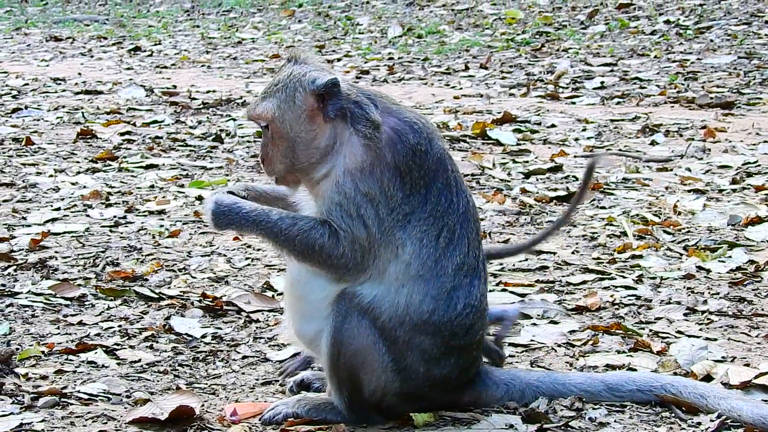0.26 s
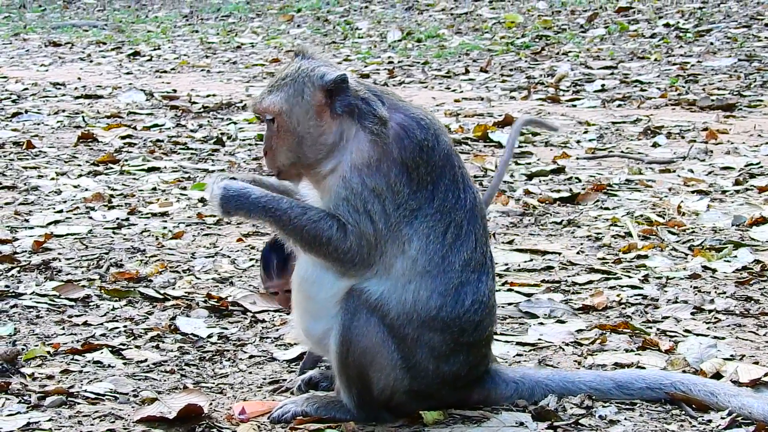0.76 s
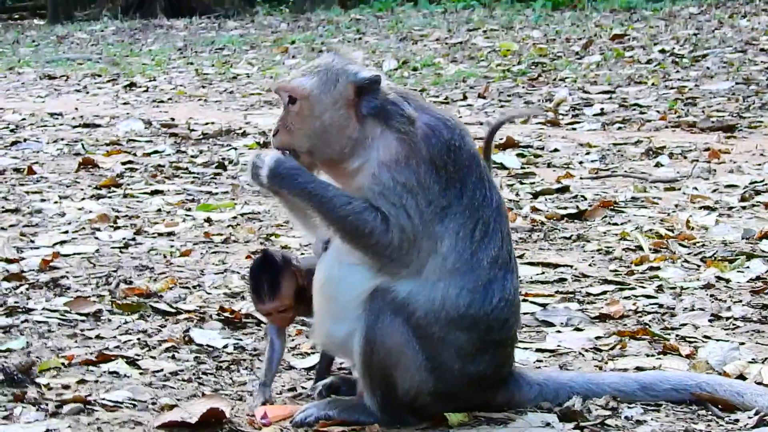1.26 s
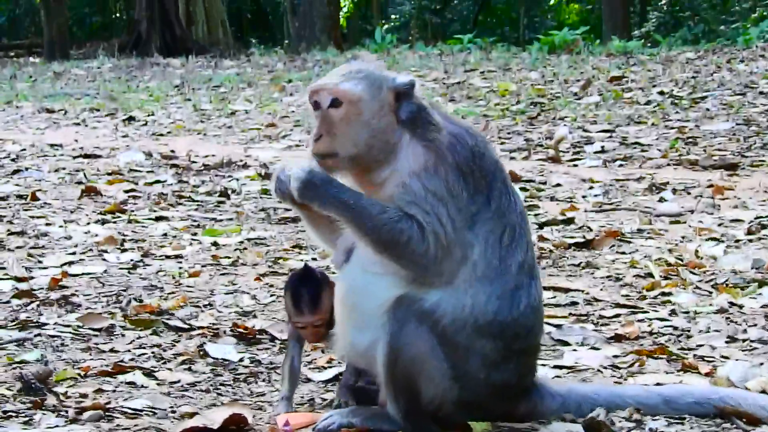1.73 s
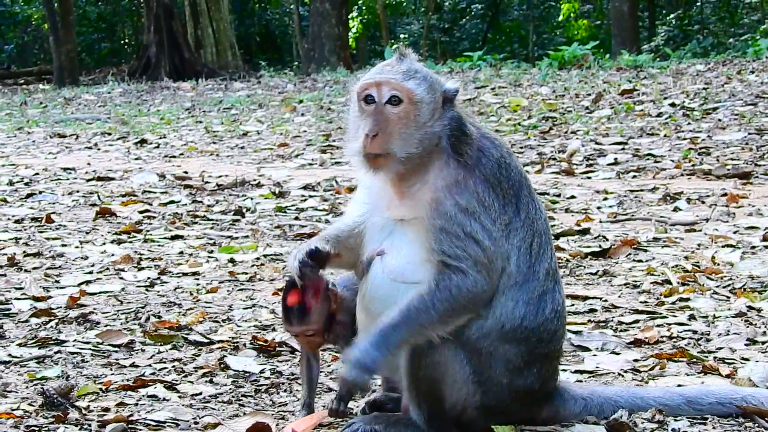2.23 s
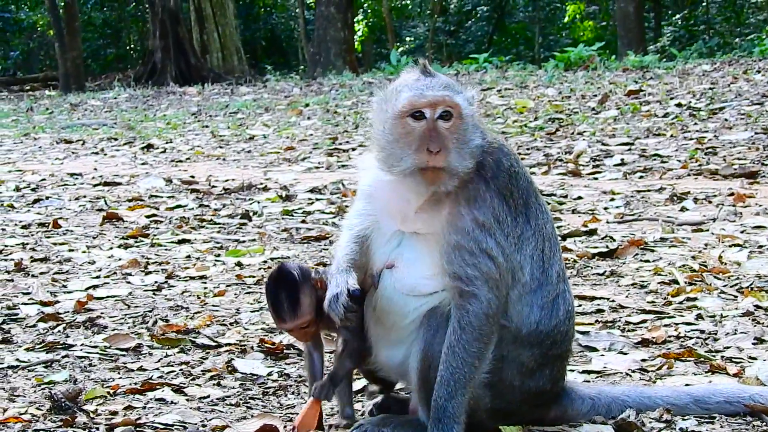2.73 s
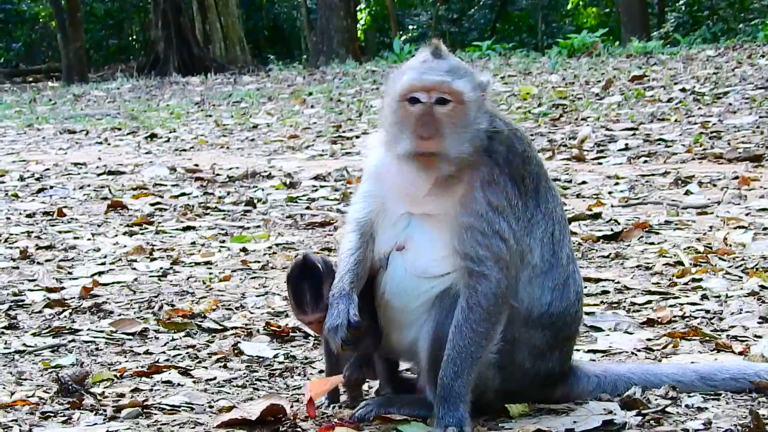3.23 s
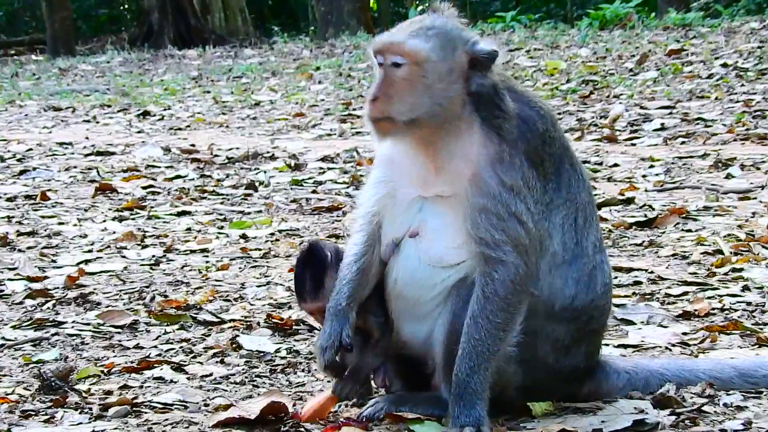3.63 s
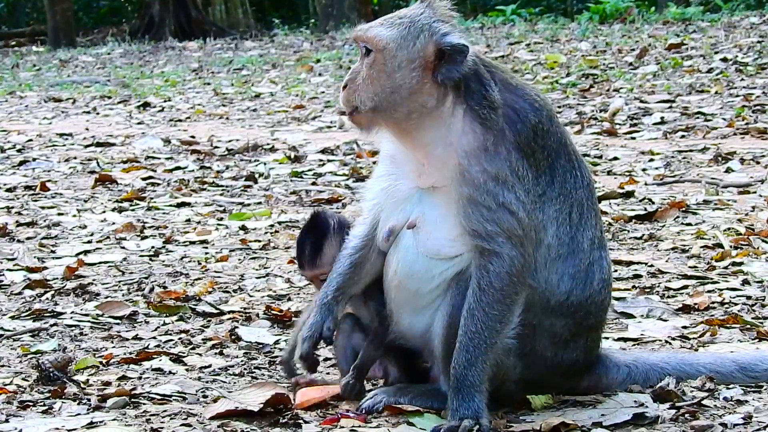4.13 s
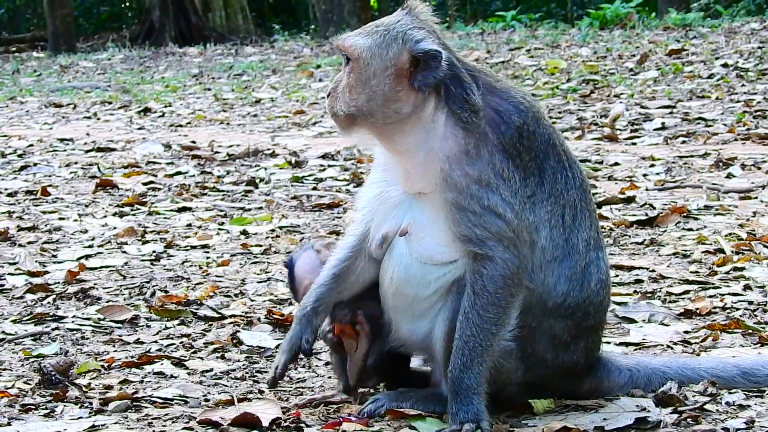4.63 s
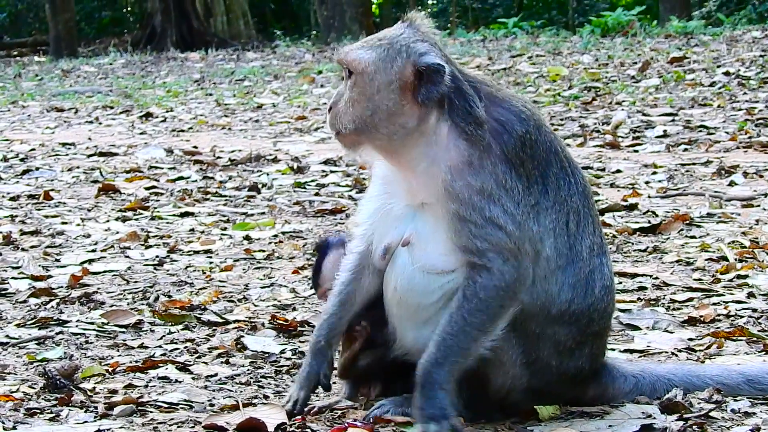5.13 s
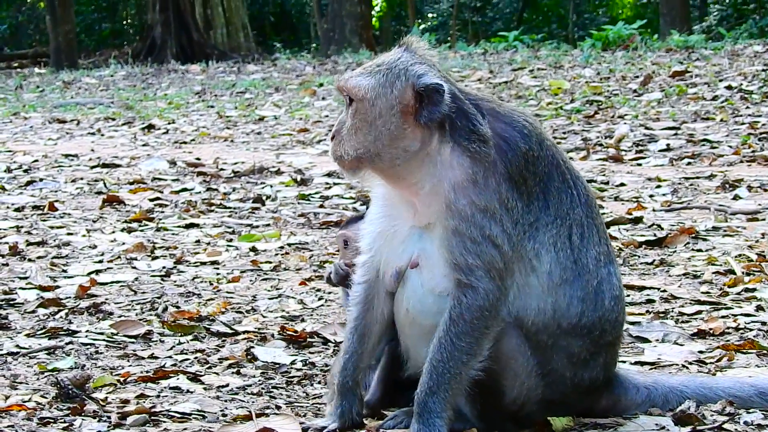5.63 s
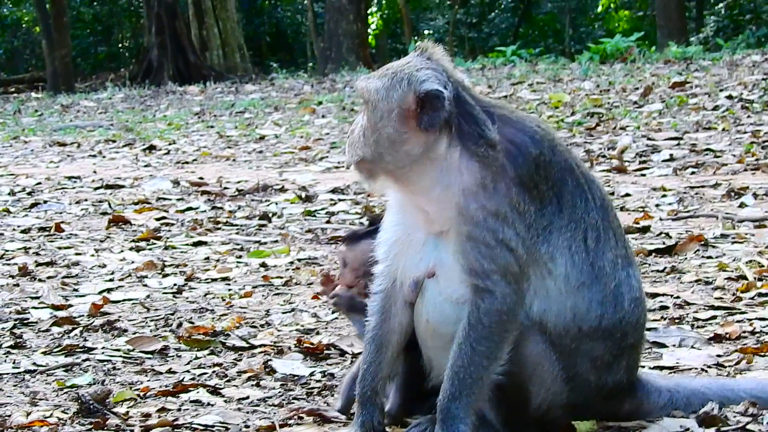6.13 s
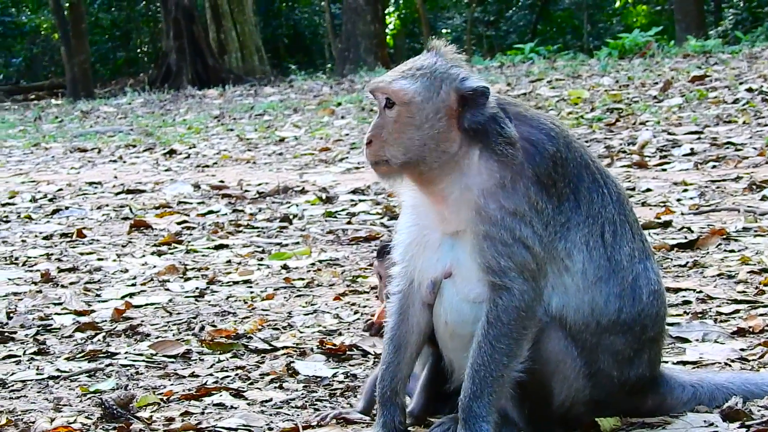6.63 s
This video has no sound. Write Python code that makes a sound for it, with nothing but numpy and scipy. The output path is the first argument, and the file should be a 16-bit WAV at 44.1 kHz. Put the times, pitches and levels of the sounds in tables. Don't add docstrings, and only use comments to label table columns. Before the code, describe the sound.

A steady metallic insect whine fills a forest clearing, with a nearer cicada pulsing about two phrases a second, clear at first and buzzy later. Low engine hum and distant traffic sit underneath, coming closer toward the end. Faint leaf scuffs and soft clicks appear early; a sharp lip pop and stronger smacks follow in the middle, then two more smacks and small bird calls. Open stereo pickup.

```python
import sys
import numpy as np
from scipy import signal
from scipy.fft import irfft, next_fast_len
from scipy.io import wavfile
from scipy.ndimage import uniform_filter1d

SR = 44100
rng = np.random.default_rng(int(sys.argv[2]) if len(sys.argv) > 2 else 0)


def invert_db(x):
    u = np.asarray(x, float) / 20
    return 10 ** u


def generate_wav(sig):
    pcm = np.round(np.clip(np.atleast_2d(sig).T, -1, 1) * 32767).astype(np.int16)
    wavfile.write(sys.argv[1], SR, pcm)


N = 303408
T = np.arange(N) / SR


def evened(x):
    return x / np.sqrt(np.mean(x ** 2) + 1e-20)


def curve(points):
    return np.interp(T, *np.transpose(points))


def read(points, hz):
    f, value = np.transpose(points)
    return np.interp(np.log(hz + 1), np.log(f + 1), value)


def sides(x, pan_db):
    return np.array([x * invert_db(pan_db / 2), x * invert_db(-pan_db / 2)])


def add(mix, s, sound):
    part = mix[:, round(s * SR):][:, :sound.shape[1]]
    part += sound[:, :part.shape[1]]


def drift(hz):
    f = np.fft.rfftfreq(next_fast_len(N), 1 / SR)
    z = rng.standard_normal((len(f), 2)) @ [1, 1j]
    return evened(irfft(z * np.exp(-(f / hz) ** 2))[:N])


def ring(x, hz, width):
    return signal.lfilter(*signal.iirpeak(hz, hz / width, SR), x)


def ring_twice(x, hz, width, second_width):
    return ring(ring(x, hz, width), hz, second_width)


def forest(x, t60=0.8, shared=0.57):
    t = np.arange(SR) / SR
    signs = rng.choice([-1., 1.], (3, SR))
    taps = signs * (rng.random((3, SR)) < .05) * invert_db(-60 * t / t60)
    taps = shared * taps[2] + np.sqrt(1 - np.clip(shared, 0, 1) ** 2) * taps[:2]
    return signal.fftconvolve(x[None], taps / np.linalg.norm(taps[0]), axes=1)[:, :N]


# f/Hz, level/dB per Hz
AIR_SPECTRUM = [(40, -23.5), (74, -1), (100, -5.5), (150, -4.5), (260, -15), (600, -22), (1200, -31),
                (2000, -33), (3000, -28), (4000, -35.5), (5400, -28), (7800, -23), (9000, -42),
                (11500, -56), (14000, -85)]
# f/Hz, left-right likeness [0-1]
COHERENCE = [(60, .996), (200, .992), (500, .97), (1500, .85), (4500, .9), (13000, .2)]
# t/s, level/dB
TRAFFIC_APPROACH = [
    (0, -2),
    (1.6, -2),
    (2.9, -2.5),
    (3.6, -2),
    (4.4, 0),
    (5.4, 1),
    (6.2, 3),
    (6.88, 5.5),
]


def air():
    hop = 512
    frames, hz = N // hop + 5, np.fft.rfftfreq(2048, 1 / SR)
    a, b, c, d, patches = rng.standard_normal((frames, 1025, 5)).T
    patches = evened(uniform_filter1d(uniform_filter1d(patches, 20, 0), 6, 1))

    near_db = np.interp(np.arange(frames) * hop / SR, *np.transpose(TRAFFIC_APPROACH))
    gust_db = 0.5
    swells = []
    for share in (0.27, 0.35, 1.14):
        swells.append(share * near_db + gust_db * np.resize(drift(2.5)[::hop], frames))
    reach = [np.interp(hz, [90, 190, 650, 1600], row) for row in np.eye(4)[:3]]

    same = np.clip(read(COHERENCE, hz), -1, 1)[:, None]
    left = a + 1j * b
    right = same * left + np.sqrt(1 - same ** 2) * (c + 1j * d)
    level_db = read(AIR_SPECTRUM, hz)[:, None] + np.transpose(reach) @ swells
    level_db = level_db + 1.75 * patches * (hz[:, None] > 300)
    z = np.array([left, right]) * invert_db(level_db)
    return invert_db(-30.0) * evened(signal.istft(z, nperseg=2048, noverlap=1536)[1][:, :N])


# t/s, level/dB
IDLE_LOAD = [
    (0.0, -33),
    (0.04, -37),
    (0.61, -36),
    (3.79, -39),
    (3.87, -56),
    (3.98, -31),
    (4.83, -38.5),
    (6.86, -30),
    (6.88, -40),
]


def hum():
    line = ring(ring(rng.standard_normal(N), 77.8, 18.45), 76, 10.3)
    return evened(line) * invert_db(curve(IDLE_LOAD) - 1.5)


# t/s, firing rate/Hz, level/dB
PUTTERING = [
    (0, 18.6, -39),
    (1.002, 16.8, -37),
    (1.601, 14.1, -37.5),
    (2.399, 16.3, -41),
    (3.198, 16.2, -45),
    (4.2, 13.3, -44.5),
    (6.88, 12.9, -41.5),
]


def engine():
    s, rate, db = np.transpose(PUTTERING)
    firings = np.floor(np.cumsum(np.interp(T, s, rate)) / SR + .3)
    puffs = np.diff(firings, prepend=0) * invert_db(1.75 * drift(7.2))
    return evened(ring(ring(puffs, 314.0, 19.7), 331.6, 79)) * invert_db(np.interp(T, s, db))


# start t/s, length t/s, from f/Hz, to f/Hz, level/dB
BIRD_GLIDES = [
    (5.85, .135, 2450, 2150, -43),
    (5.9, .04, 2600, 2430, -44),
    (6.14, .09, 2250, 1780, -44),
    (6.235, .06, 1950, 1830, -40),
    (.705, .06, 2900, 3500, -43),
    (6.838, .045, 2400, 2150, -31),
    (1.33, .25, 500, 480, -40),
    (1.48, .12, 648, 647, -43),
    (5.56, .22, 3400, 3110, -43),
]


def birds():
    out = np.zeros((2, N))
    for s, length, from_hz, to_hz, db in BIRD_GLIDES:
        u = np.linspace(0, 1, round(length * SR))
        glide = from_hz + (to_hz - from_hz) * u ** .55
        glide = glide * (1 + 0.0144 * drift(83)[:len(u)])
        tone = np.sin(2 * np.pi * np.cumsum(glide) / SR)
        add(out, s, sides(invert_db(db) * tone * signal.windows.tukey(len(u), .45), 0))
    return out


# t/s, length t/s, level/dB, centre f/Hz
LEAF_RUSTLES = [
    (0.715, .25, -41, 3400),
    (0.84, 0.1, -44, 1700),
    (1.996, 0.064, -43, 1500),
    (3.737, 0.077, -40, 1000),
    (5.6, .2, -50, 3150),
    (5.899, 1, -46, 1504),
]


def rustles():
    out = np.zeros((2, N))
    for s, length, db, hz in LEAF_RUSTLES:
        size = round(length * SR)
        grains = rng.standard_normal(size) * invert_db(3 * rng.exponential(1, size).clip(0, 4))
        crackle = evened(ring_twice(grains, hz, hz, hz)) * signal.windows.tukey(size, .6)
        add(out, s, sides(invert_db(db) * crackle, -0.73))
    return out


# t/s, peak level/dB, centre f/Hz, width f/Hz, left-right level/dB
SMACKS = [(.812, -30, 1400, 714, 4), (1.692, -28, 1690, 900, -3), (3.758, -43, 892.4, 903, -29),
          (3.782, -26, 1100, 1210, -9), (4.2282, -15, 1300, 1497, -5), (4.308, -13.5, 1299, 1514, -7),
          (4.347, -39, 1410, 1200, -20), (4.359, -15.5, 730, 903, -4), (4.384, -48, 843, 613, -1),
          (6.22, -19.5, 926, 471.7, -5), (6.252, -19, 640, 297, -1)]


def smacks():
    out, click = np.zeros((2, N)), signal.unit_impulse(2000)
    for s, db, hz, width, pan_db in SMACKS:
        snap = ring_twice(click, hz, width, 0.88 * width)
        snap += .3 * np.roll(snap, round(.007 * SR))
        add(out, s, sides(invert_db(db) * snap / abs(snap).max(), pan_db))
    return out


# t/s, level/dB
LIP_SLIPS = [
    (3.4522, -10.5),
    (3.4536, -2.5),
    (3.4548, -16),
    (3.457, -7.5),
]
# f/Hz, width f/Hz, level/dB
MOUTH = [(229.6, 39, 3.5), (550, 30, 0.5), (715, 230, 13.5), (882, 104, 10.5), (1156, 200, -39),
         (1650, 350, 10), (1910, 360, 10.5), (3240, 750, -25), (6000, 3000, -24)]


def lip_pop():
    out, click = np.zeros((2, N)), signal.unit_impulse(2000)
    pop = -sum(invert_db(db) * ring_twice(click, hz, width, 2 * hz) / width for hz, width, db in MOUTH)
    for s, db in LIP_SLIPS:
        add(out, s, sides(invert_db(db) * pop / abs(pop).max(), -1.2))
    noise = rng.standard_normal((3, round(.0055 * SR)))
    crack = (noise[2] + .6 * noise[:2]) * np.hanning(noise.shape[1])
    add(out, 3.451, invert_db(-20.5) * ring(crack, 6500, 7000))
    return out


def small_sounds():
    out = birds() + rustles() + smacks() + lip_pop()
    return out + invert_db(-12.5) * forest(out.mean(0), t60=0.13, shared=0.25)


def tymbals(rate_hz, levels_db, uneven=0.046):
    k = np.arange(10, 51)
    lines = np.zeros((2, 2049), complex)
    lines[k % 2, k] = invert_db(np.interp(k / 2, np.arange(5, 26), levels_db))
    phases = np.exp(2j * np.pi * rng.random(lines.shape))
    cycles = irfft(lines * phases) * lines.shape[1] * np.sqrt(2)
    place = np.cumsum(rate_hz) / SR / 2 % 1 * cycles.shape[1]
    both, difference = (np.interp(place, np.arange(len(c)), c, period=len(c)) for c in cycles)
    return both + uneven * difference


# click rate f/Hz, level/dB, left-right level/dB
FAR_SINGERS = [
    (538.2, -3, 2),
    (539.6, 0, -3),
    (540.6, 0, 0),
    (541.8, -1, 3),
    (543.2, -3, -4),
]
FAR_MULTIPLES = [-38, -58.5, -60, -55, -50.5, -27.5, -39.5, -43.5, -56, -54, -34.5, -60, -66, -74, -77,
                 -53.5, -86, -99, -99, -99, -73]
# f/Hz, width f/Hz, level/dB
FAR_HISS = [(2628, 110, -46), (5423, 240, -32), (7800, 500, -59)]
# t/s, level/dB
TREBLE_WANE = [
    (0, 0),
    (1.3, -1),
    (4, -3),
    (5.2, -7),
    (6.88, -10),
]


def chorus():
    out = np.zeros((2, N))
    for hz, db, pan_db in FAR_SINGERS:
        song = tymbals(hz * (1 + .0028 * drift(8.08) + 0.00193 * drift(61.0)), FAR_MULTIPLES)
        song *= invert_db(db - 5.5 + 3 * drift(7.7))
        song *= 1 + .1 * drift(200)
        left, right = sides(song, pan_db)
        out += [left, np.roll(right, round(pan_db))]
    low = signal.sosfiltfilt(signal.butter(4, 4000, fs=SR, output="sos"), out)
    out = low + (out - low) * invert_db(curve(TREBLE_WANE))
    hiss = np.zeros(N)
    for hz, width, db in FAR_HISS:
        hiss += invert_db(db) * evened(ring_twice(rng.standard_normal(N), hz, width, width))
    return invert_db(2) * out + invert_db(1.5) * forest(out.mean(0) + hiss, shared=1.0)


# f/Hz, width f/Hz, level/dB
AIR_SACS = [(2585, 683, -14.5), (5328, 305, 2), (5700, 75, -1), (5886, 108, -7), (6460, 300, -17),
            (7940, 610, -12), (10480, 596, -35), (13387, 900, -57)]


def sacs(x):
    return sum(invert_db(db) * ring_twice(x, hz, width, 0.52 * width) for hz, width, db in AIR_SACS)


# t/s, level/dB of the tenth multiple, click rate f/Hz
WARMUP_THROBS = [(0.018, -27, 536.8), (0.101, -27, 538.2), (0.175, -16.5, 539.2), (0.271, -21.5, 536.8),
                 (0.362, -19.5, 540.3), (0.458, -29, 542), (0.571, -36, 541), (0.691, -24, 544.6),
                 (0.789, -42, 537.7), (0.899, -17.5, 542.4), (0.984, -22, 537.7), (1.081, -36, 538.2),
                 (1.171, -19.5, 540.7), (1.273, -23, 536.6), (1.391, -12, 540.6), (1.521, -12, 543)]
# start t/s, length t/s, level/dB, fade level/dB by the last throb, rasp [0-1]
SONG_PHRASES = [(1.706, 0.33, -10, -5.5, 0.11), (2.209, 0.33, -11.5, -2, 0.16), (2.737, 0.3, -11, -5, 0.29),
                (3.229, 0.32, -13.5, -0.5, .4), (3.742, 0.3, -13.5, -4, 0.51), (4.22, 0.31, -15, -1, 0.56),
                (4.712, 0.33, -15.5, -1, 0.67), (5.249, .329, -15.5, -2.5, .75), (5.727, 0.39, -17, -1, .8),
                (6.308, 0.34, -19.5, 0.5, .95), (6.753, 0.28, -18.5, -6.5, 0.99)]
# place [0-1], clear click rate f/Hz, resistance to rasp [exponent],
# left-right level/dB, other multiples level/dB
PHRASE_BEATS = [
    (0, 543.7, 1.8, -5, -36),
    (.33, 539, 1, -2.5, -32),
    (.64, 545, .85, -2.5, -34),
    (1, 544, 2.6, -6.5, -30),
]


def throbs():
    rows = [(s, db, hz, 0.099, 0, -34.5) for s, db, hz in WARMUP_THROBS]
    sag_hz = 10.5
    for start, length, db, fade_db, rasp in SONG_PHRASES:
        for place, hz, resist, pan_db, others_db in PHRASE_BEATS:
            own = np.clip(rasp, 0, 1) ** resist
            s = start + place * length
            rows.append((s, db + place * fade_db, hz - sag_hz * own, own, pan_db, others_db))
    return np.transpose(rows)


NEAR_MULTIPLES = [-40.5, -59, -58.5, -60.5, -75, -91, -42.5, -45.5, -51.5, -54, -40.5, -49.5, -62.5, -78,
                  -63.5, -68, -67, -109, -110, -109, -78]


def soloist():
    s, db, hz, rasp, pan_db, others_db = throbs()
    nearest = np.searchsorted((s[1:] + s[:-1]) / 2, T)
    since = T - s[nearest]
    swell = np.exp(-abs(since / 0.035) ** 1.63)
    rate = uniform_filter1d(hz[nearest], 3000) * (1 + 0.001308 * drift(25.4))
    pan_db, db, others_db = (uniform_filter1d(c[nearest], 1200) for c in (pan_db, db, others_db))
    rasp = np.clip(rasp[nearest], 0, .95) * np.clip(1 + since / 0.82, 0, 2)
    rasp = uniform_filter1d(rasp, 600).clip(0, .97)
    clear = np.sqrt(1 - rasp ** 2)

    turns = 2 * np.pi * np.cumsum(rate) / SR
    tenth = np.sqrt(2) * np.sin(10 * turns) * clear * (0.14 + 0.57 * swell)
    half = np.sin(10.5 * turns) * invert_db(-25) * (0.18 + rasp) * swell
    others = tymbals(rate, NEAR_MULTIPLES, 0.074 + 0.68 * rasp) * invert_db(others_db + 37.5)
    others *= clear ** 3 * (0.39 + 0.45 * swell)

    burst = np.cumsum(80 * (1 + 0.086 * drift(15))) / SR % 1
    sagging = rate * (1 + 0.047 * uniform_filter1d(.5 - burst, 60) + 0.00999 * drift(156.0))
    clicks = tymbals(sagging, np.zeros(21), 0.5) * np.exp(-burst / .5)
    bursts = (0.013 + rasp) * (0.34 + 0.45 * swell) * evened(sacs(clicks))

    main = invert_db(db) * (tenth + half + bursts)
    direct = invert_db(1.12) * sides(main, pan_db) + sides(others, -0.31)
    return direct + invert_db(-3.0) * forest(main + others, t60=0.53, shared=0.53)


def scene():
    return air() + hum() + engine() + small_sounds() + chorus() + soloist()


def low_pass(x):
    return signal.sosfilt(signal.butter(12, 14100, fs=SR, output="sos"), x)


def record(dry):
    cut = signal.sosfilt(signal.butter(7, 58, "high", fs=SR, output="sos"), dry)
    return low_pass(np.clip(cut, -1, 1))


dry = scene()
out = record(dry)
generate_wav(out)
```